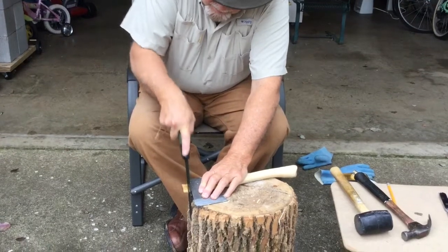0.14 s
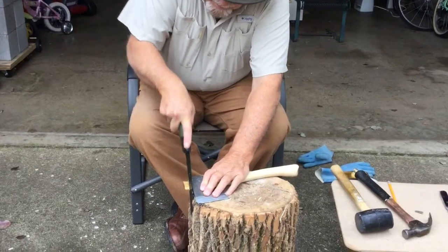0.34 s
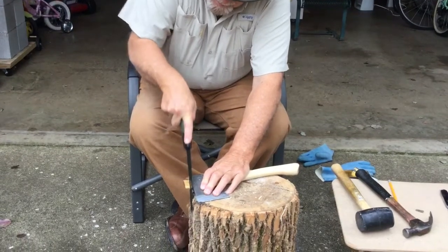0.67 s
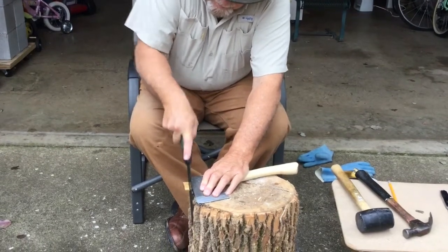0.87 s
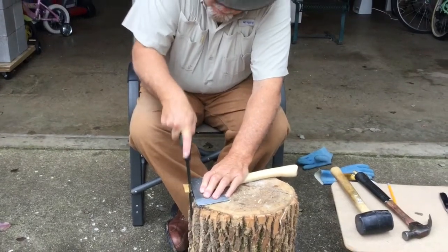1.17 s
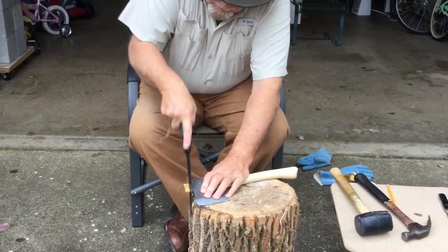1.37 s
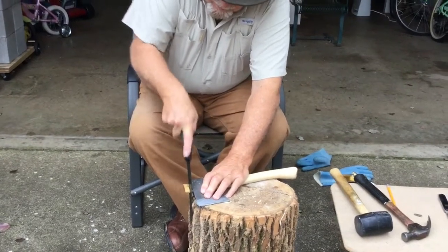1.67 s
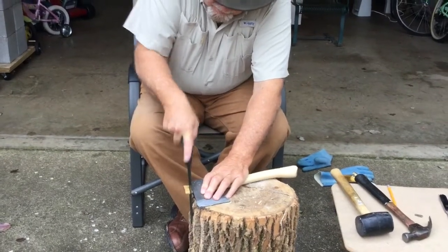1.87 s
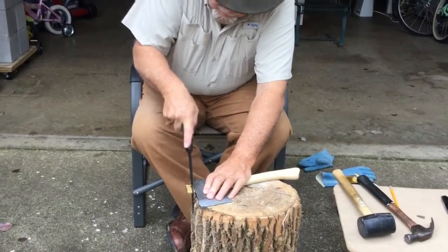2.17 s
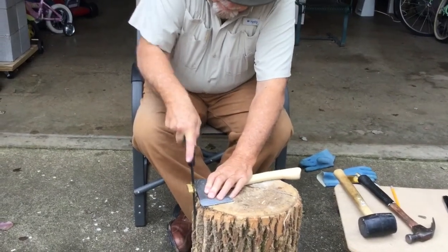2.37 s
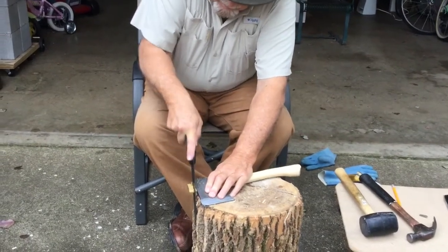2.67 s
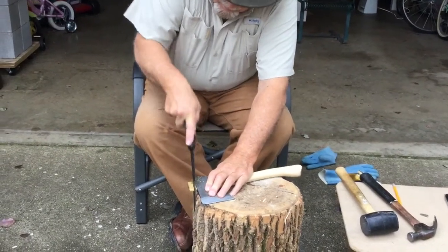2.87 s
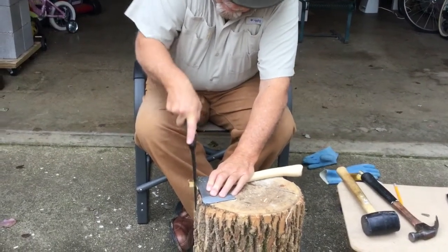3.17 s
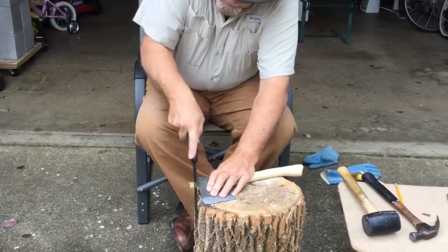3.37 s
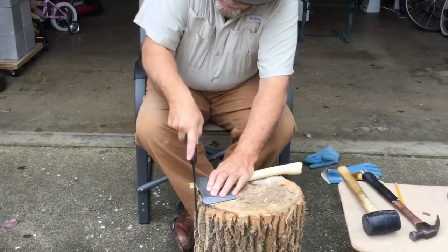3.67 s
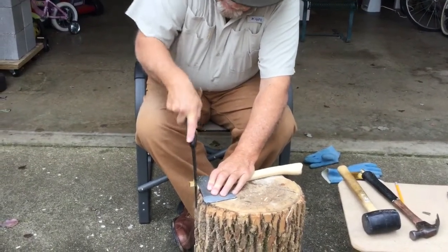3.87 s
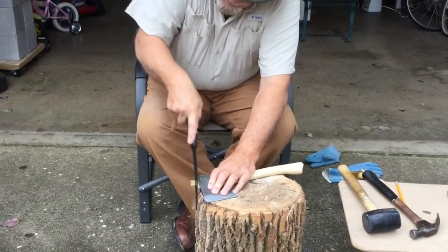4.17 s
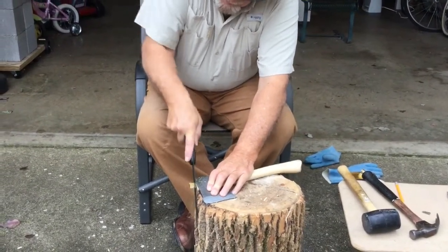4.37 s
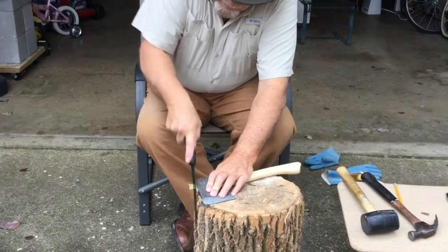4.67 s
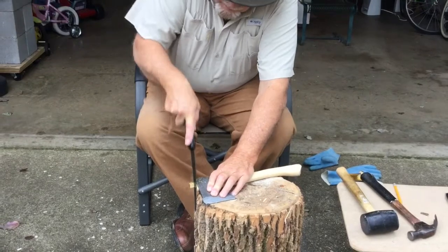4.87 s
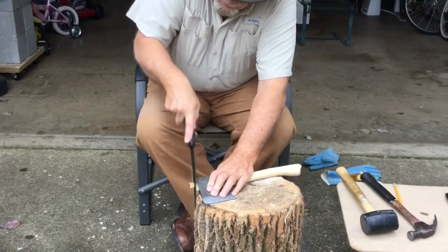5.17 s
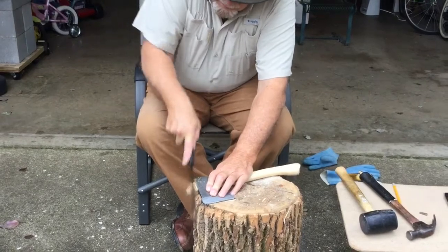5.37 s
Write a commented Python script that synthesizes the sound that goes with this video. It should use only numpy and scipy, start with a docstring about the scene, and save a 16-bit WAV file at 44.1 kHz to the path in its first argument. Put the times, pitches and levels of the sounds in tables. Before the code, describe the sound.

Sawing is under way from the start. A small hand saw cuts a wooden handle braced on a stump, with strokes about 0.17 seconds apart, pull and push alternating. Each is a dry, gritty rasp of roughly a tenth of a second, bright and hissy with a thin steely edge and a hollow woody tone. Pulls are lighter; pushes add a low, juddering thump from the stump. A narrow whistly colour drifts down during the first second, jumps high around 1.4 to 1.7, then sinks gradually after 3.5. Small tooth ticks come early and near 2.1 and 2.7, with a sharp snap at 3.3. Soft turning bumps grow clearer after 2.4; faint dull knocks occur around 2.7, 4.0 and 4.8, stronger at 5.14. The final push stops dead at 5.44 in a loud, crisp double wooden clack, leaving a short garage echo and quiet low outdoor rumble.

```python
"""A small hand saw cuts through a wooden handle held down on a stump, in front of an open garage.
Teeth tear fibres on every pull and push: noise bursts and tooth pulses excite modes of blade and wood.
Judder kicks the stump's low resonances, mostly on the push; a narrow resonance drifts as the cut deepens.
Caught teeth snap free, knocks ring the handle, turns bump the stump; the last stroke ends in a wooden clack.
Scatter and a garage echo follow each sound, over a steady low outdoor noise."""
import sys
import numpy as np
from scipy import signal
from scipy.fft import rfft, irfft, next_fast_len
from scipy.io import wavfile
from scipy.ndimage import map_coordinates

SR = 44100
rng = np.random.default_rng(int(sys.argv[2]) if len(sys.argv) > 2 else 0)


def generate_wav(signal):
    """Clip the signal to [-1, 1] and save it as 16-bit WAV at the path in sys.argv[1]."""
    frames = np.transpose(np.atleast_2d(signal))
    scaled = np.clip(frames, -1, 1) * 32767
    pcm = np.round(scaled).astype(np.int16)
    wavfile.write(sys.argv[1], SR, pcm)


N = 243873
SIZE = 16384  # samples in one event
T = np.arange(SIZE) / SR  # seconds

# Saw strokes, pull and push in turn. Each row: start in seconds, length in seconds,
# share of the length spent speeding up, rasp level in dB, thump level in dB.
STROKES = [(-0.001, 0.12, 0.16, -48, -49.5), (0.168, 0.11, 0.22, -50.5, -33.5),
           (0.341, 0.11, 0.29, -46.5, -47.2), (0.498, 0.083, 0.37, -48, -40),
           (0.649, 0.11, 0.61, -48.5, -47.5), (0.849, 0.091, 0.24, -48, -37.3),
           (1.019, 0.11, 0.27, -47.5, -47.5), (1.198, 0.098, 0.33, -47, -33.5),
           (1.364, 0.13, 0.26, -45, -43), (1.547, 0.1, 0.39, -48.5, -36), (1.722, 0.1, 0.18, -46.5, -48.5),
           (1.892, 0.101, 0.31, -45, -30.5), (2.056, 0.16, 0.34, -47.5, -44.5),
           (2.262, 0.12, 0.23, -47.5, -34), (2.426, 0.14, 0.17, -43.3, -39),
           (2.604, 0.14, 0.27, -47.0, -31.5), (2.791, 0.11, 0.15, -45.5, -49.5),
           (2.956, 0.1, 0.22, -43.5, -30.5), (3.094, 0.14, 0.24, -47, -46.5),
           (3.282, 0.1, 0.47, -45, -27.5), (3.465, 0.12, 0.22, -45, -48),
           (3.599, 0.133, 0.55, -46.5, -33.5), (3.792, 0.13, 0.33, -47, -50.5),
           (3.989, 0.11, 0.2, -45.5, -31), (4.146, 0.14, 0.18, -46.5, -47.5),
           (4.335, 0.1, 0.38, -46.5, -34), (4.472, 0.14, 0.32, -48.5, -47), (4.664, 0.11, 0.39, -48, -29.5),
           (4.836, 0.14, 0.34, -49.5, -41), (4.993, 0.12, 0.34, -49.5, -34.5),
           (5.14, 0.14, 0.36, -48, -42.5), (5.348, 0.12, 0.54, -44.5, -27)]
# A tooth snags and lets go. Each row: start in seconds, relative peak in dB, decay by 60 dB in seconds.
SNAGS = [(0.014, -29, 0.014), (0.194, -33.5, .025), (0.417, -26.5, 0.023), (0.662, -35.5, 0.028),
         (2.089, -33, .025), (2.161, -29, 0.018), (2.688, -34, 0.026), (2.812, -33, 0.026),
         (3.2944, -17, 0.012), (3.878, -37, 0.013), (4.165, -35.5, 0.067), (5.433, -24, 0.017)]
# Blade or handle knocks on wood. Each row: start in seconds, relative peak in dB,
# frequency in Hz above which the contact is too soft to ring.
CLACKS = [(1.001, -47.5, 2000), (2.394, -45, 2050), (2.687, -38.5, 2000), (4.001, -39, 2510),
          (4.098, -41, 2120), (4.672, -51, 2000), (4.795, -37, 1700), (5.1425, -31, 1980),
          (5.4416, -16.5, 4530), (5.4486, -25, 2400)]
# The handle rocks on the stump as the saw turns round. Each row: start in seconds, relative peak in dB.
BUMPS = [(0.618, -39), (0.983, -32.5), (1.328, -35.5), (1.701, -35), (2.013, -28.5), (2.415, -25),
         (2.764, -25.5), (3.722, -32.5), (4.474, -29), (4.797, -25.5), (5.143, -24), (5.438, -32)]
# Modes of the knocked handle. Each row: frequency in Hz, mean level in dB, decay by 60 dB in seconds.
HANDLE_MODES = [(487, -4.5, 0.047), (764, -12, 0.063), (1083, -1.5, .035), (1270, -3, 0.041),
                (1540, -1, .035), (1837, -2, 0.042), (2067, -1, 0.035), (2360, -4, 0.038), (3500, 0, 0.031),
                (4430, -10, 0.06)]
# Ringing modes of the steel blade. Each row: frequency in Hz, width in Hz, relative level in dB.
BLADE_MODES = [(2567, 33, -19.5), (3510, 230, -13.5), (3763, 51, -18), (4040, 230, -14), (4590, 100, -19.5),
               (5196, 43, -16.5), (5960, 160, -17.5), (6550, 89, -20.5), (7580, 61, -23.5),
               (8200, 170, -12), (8220, 32, -25), (9370, 170, -14), (10900, 300, -17.5), (12560, 130, -14)]
# Rasp of the teeth. Each row: frequency in Hz, relative density in dB per Hz.
RASP = [(1500, -27), (2400, 0.5), (2800, 2.5), (3600, 4), (4500, -0.5), (6000, 3.5), (7100, 1.5),
        (8200, 4.5), (9300, 1), (10500, -12.5), (14000, -40)]
# Ring of the wood. Each row: frequency in Hz, relative density in dB per Hz.
WOOD = [(300, -18.5), (430, -24.5), (620, -3.5), (850, -27.5), (1100, -7.5), (1300, 5), (1500, 6),
        (1750, -5), (2050, 1), (2400, -11), (3200, -26.5)]
# Treble fizz of the fibres. Each row: frequency in Hz, relative density in dB per Hz.
FIZZ = [(7500, -53), (9800, -5), (10900, 1), (11700, 0.5), (12600, -1), (13600, -1.5), (14700, -8),
        (15800, -25.5)]
# Handle and stump under load. Each row: frequency in Hz, relative density in dB per Hz.
STUMP = [(25, -54), (90, -30.5), (125, -17), (166, 1.5), (208, -3.5), (238, 2), (268, 2), (298, -2),
         (325, -14), (355, -13.5), (430, -28), (600, -46), (1200, -62), (5000, -100)]
# Dry crack of wood struck hard. Each row: frequency in Hz, relative density in dB per Hz.
CRACK = [(250, -28), (500, -3), (750, -5.5), (1100, -12), (1500, 6), (2000, -2.5), (2400, -1),
         (2900, -10.5), (4200, -4), (6000, -13), (12000, -36)]
# Slowly drifting narrow resonance of the cut. Each row: time in seconds, frequency in Hz, relative level in dB.
KERF = [(0, 4950, -3), (.65, 3550, -6.5), (1.2, 2720, -12.5), (1.36, 7700, -8), (1.72, 10900, -12),
        (2.42, 8300, -2), (2.8, 8650, -9), (3.46, 8670, 2.5), (3.79, 7860, -1), (3.99, 6000, -1.5),
        (4.45, 4830, -6), (4.68, 4020, 0), (5.35, 3060, -12)]
# Strength of the fizz. Each row: time in seconds, relative level in dB.
FIZZ_LEVEL = [(0, -5.5), (1.1, -3.5), (2.5, -5.5), (3.4, -3.5), (3.65, -9), (4.15, -8), (4.85, -2.5),
              (5.35, -2)]
# Decay of the garage echo. Each row: frequency in Hz, decay by 60 dB in seconds.
GARAGE_T60 = [(150, 0.5), (350, 0), (1500, 0.53), (5000, 0.32), (14000, 1.6)]
# Strength of the garage echo. Each row: frequency in Hz, level in dB.
GARAGE_DB = [(150, -4.5), (350, -9), (700, -7), (2000, -9.5), (12000, -19.5)]
# Outdoor background. Each row: frequency in Hz, relative density in dB per Hz.
AMBIENT = [(25, -27), (40, -9), (65, 4.5), (110, 3.5), (170, 8), (270, -4.5), (350, 5), (430, -17),
           (900, -19), (2000, -25.5), (5000, -27.5), (15000, -42.5)]

HOLD_SHARE = 0.33  # share of each stroke between speeding up and slowing down
# The pull eases off, the push leans in: swell over the hold in dB, relative level of the wood in dB.
PULL, PUSH = (-2, -6.5), (0.97, -4)
WOOD_DB_PER_S = 0.58  # the handle rings more freely as the cut deepens
GRAZE_S, GRAZE_DB = 0.016, -21  # the teeth brush the cut lightly just before they bite
JAM_S = 5.440  # the last stroke stops dead as the saw knocks against the wood
TOP_HZ = 15850  # upper band limit of the microphone


def saw(judder_hz=69, judder_wander=0.12, tooth_hz=950, grip_db=1.5, steel_db=-1.5):
    """Forced vibration: the tearing force of each stroke sounds through blade, wood and stump."""
    track = np.zeros(N)
    steel = sum(amp(db + steel_db) * resonance(hz, width) for hz, width, db in BLADE_MODES)
    rasp, wood, fizz = body(RASP), body(WOOD), body(FIZZ)
    for k, (s, length, rise_share, rasp_db, thump_db) in enumerate(STROKES):
        swell_db, wood_db = PUSH if k % 2 else PULL
        ring_hz, ring_db = at(KERF, s)
        fizz_db, = at(FIZZ_LEVEL, s)
        start = s - GRAZE_S
        speed = hand_speed(length, rise_share, swell_db) * (start + T < JAM_S)
        # running counts of judders and of passing teeth
        judder = rng.random() + np.cumsum(judder_hz * np.exp(judder_wander * wobble(39.3))) / SR
        # the tooth rate follows the hand, unsteadily
        teeth = np.cumsum(tooth_hz * np.sqrt(speed) * amp(0.7 * wobble(90))) / SR
        # hard and soft grain make the teeth grip unevenly
        cut = matched(speed * amp(grip_db * wobble(107)), speed)
        parts = [
            amp(-2.5) * rasp,
            steel,
            amp(wood_db + WOOD_DB_PER_S * s) * wood,
            amp(fizz_db) * fizz,
            amp(ring_db) * resonance(ring_hz, width_hz=0.08 * ring_hz),
        ]
        scrape = np.zeros(SIZE)
        for part in parts:
            # each part has its own fibre noise, under the same judder and teeth
            force = tearing(cut, judder, teeth, tooth_depth=1.0, tooth_tone=0.28,
                            judder_db=1.5, clump_db=2.5)
            scrape += through(force, part)
        scrape = sliding(scrape, depth_db=3.8, patch_hz=380, patch_s=0.022)
        thump = thumping(speed, judder, lag_s=0.0054, scatter_db=1.5, rub=0.61)
        add(track, start, in_garage(amp(rasp_db) * scrape + amp(thump_db) * thump))
    return track


def hand_speed(length, rise_share, swell_db):
    """Kinematics of a stroke: the hand creeps off, speeds up, runs on and stops."""
    corners = GRAZE_S + length * np.clip([0, rise_share, rise_share + HOLD_SHARE, 1], 0, 1)
    speeds = [0, amp(GRAZE_DB), amp(-swell_db / 2), amp(swell_db / 2), 0]
    return np.interp(T, [0, *corners], speeds)


def tearing(speed, judder, teeth, tooth_depth, tooth_tone, judder_db, clump_db):
    """Periodic excitation: each tooth gives a push and a burst of snapping fibres, harder at each judder."""
    bite = np.exp(-tooth_depth * (teeth % 1))
    snaps = unit(rng.standard_normal(SIZE) * bite)
    pushes = unit(np.diff(np.floor(teeth), prepend=0)) * np.sqrt(np.mean(speed > 0))
    pressure_db = judder_db * np.cos(2 * np.pi * judder) + clump_db * wobble(400.0)
    force = (snaps + tooth_tone * pushes) * amp(pressure_db) * speed
    return matched(force, speed)


def sliding(sound, depth_db, patch_hz, patch_s):
    """Moving excitation point: as the cut slides along the blade, groups of modes swell and fade."""
    window, overlap = 512, 384
    z = signal.stft(sound, nperseg=window, noverlap=overlap)[2]
    bins, frames = np.indices(z.shape)
    # a smooth random field over frequency and time
    places = [bins * SR / window / patch_hz, frames * (window - overlap) / SR / patch_s]
    field = map_coordinates(rng.standard_normal((200, 100)), places, mode="wrap")
    shaded = signal.istft(z * amp(depth_db * field), nperseg=window, noverlap=overlap)[1]
    return matched(shaded[:SIZE], sound)


def thumping(speed, judder, lag_s, scatter_db, rub):
    """Impulsive forcing: judder kicks and rubbing shake the stump; the load lags just behind the stroke."""
    load = np.interp(T - lag_s, T, speed, left=0)
    kicks = np.diff(np.floor(judder), prepend=0) * amp(scatter_db * wobble(69.0))
    force = load * (unit(kicks) + rub * rng.standard_normal(SIZE))
    return matched(through(force, body(STUMP)), load)


def snags(ring=1.5, fizz=1.0):
    """Sudden release: a caught tooth springs free, and a short decaying noise force excites the steel."""
    track = np.zeros(N)
    steel = body(RASP) + ring * resonance(7580, width_hz=920) + fizz * body(FIZZ)
    for s, db, t60 in SNAGS:
        force = rng.standard_normal(SIZE) * amp(-60 * T / t60)
        snap = through(force, steel)
        add(track, s, amp(db) * in_garage(peaked(snap)))
    return track


def clacks(crack=1.6, crack_t60=0.037, gain_db=-1.0):
    """Modal impact: a contact rings the handle under a woody crack; soft contacts lose the treble."""
    track = np.zeros(N)
    for s, db, soft_hz in CLACKS:
        ring = np.zeros(SIZE)
        for hz, level_db, t60 in HANDLE_MODES:
            # each knock excites the modes a little differently
            decay = amp(level_db + rng.normal(0, 0.85) - 60 * T / t60)
            ring += decay * np.sin(2 * np.pi * (hz * T + rng.random()))
        force = rng.standard_normal(SIZE) * amp(-60 * T / crack_t60)
        clack = ring + crack * through(force, body(CRACK))
        clack = signal.sosfilt(signal.butter(2, soft_hz, fs=SR, output="sos"), clack)
        add(track, s, amp(db + gain_db) * in_garage(peaked(clack)))
    return track


def bumps(gain_db=1.5, wood_db=-34):
    """Impulse response: one soft blow at a turn of the saw lets the stump sound by itself."""
    track = np.zeros(N)
    thud = body(STUMP) + amp(wood_db) * body(CRACK)
    for s, db in BUMPS:
        add(track, s, amp(db + gain_db) * in_garage(peaked(thud)))
    return track


def in_garage(sound, near_db=-8, near_t60=0.15):
    """Reverberation: direct sound, quick scatter off ground and nearby things, and the garage's echo."""
    hz, t, z = signal.stft(rng.standard_normal(SR // 2), SR, nperseg=256)
    t60 = along(GARAGE_T60, hz)[:, None]
    level_db = along(GARAGE_DB, hz)[:, None]
    # the root gives each band's decay the same energy, whatever its length
    gain = amp(level_db - 60 * t / t60) * np.sqrt(2 * np.log(1000) / (t60 * SR))
    late = signal.istft(z * gain, SR, nperseg=256)[1]
    echo = np.pad(late, (SR // 200, 0))  # arrives 5 ms late
    scatter = unit(rng.standard_normal(SIZE) * amp(-60 * T / near_t60)) / np.sqrt(SIZE)
    echo[:SIZE] += amp(near_db) * scatter
    echo[0] = 1  # direct sound
    return signal.fftconvolve(sound, echo) / np.hypot(1, amp(near_db))


def outdoors(db=-53):
    """Stationary noise: filtered white noise gives the steady low rumble of the surroundings."""
    noise = signal.fftconvolve(rng.standard_normal(N + SIZE), body(AMBIENT))[SIZE:SIZE + N]
    return amp(db) * unit(noise)


def body(spectrum):
    """Minimum phase: the causal impulse response of energy 1 that has this spectrum."""
    gain = amp(along(spectrum, np.fft.rfftfreq(SIZE, 1 / SR)))
    cepstrum = irfft(np.log(gain))
    fold = 1 + np.sign(SIZE // 2 - np.arange(SIZE))  # keeps the causal half
    return unit(irfft(np.exp(rfft(cepstrum * fold)))) / np.sqrt(SIZE)


def resonance(hz, width_hz):
    """Damped oscillator: the impulse response of energy 1 of a single mode."""
    return unit(np.sin(2 * np.pi * hz * T) * np.exp(-np.pi * width_hz * T)) / np.sqrt(SIZE)


def through(force, response):
    """Convolution: the sound of a force acting on a body."""
    return signal.fftconvolve(force, response)[:len(force)]


def wobble(rate):
    """Random modulation: a smooth curve for one event, with rate knots a second."""
    return map_coordinates(rng.standard_normal(SIZE // 16), [T * rate], mode="wrap")


def amp(db):
    """Logarithmic level: decibels to gain."""
    return 10 ** (np.asarray(db) / 20)


def unit(x):
    """Normalisation: scale to rms 1."""
    return x / np.sqrt(np.mean(x ** 2) + 1e-20)


def peaked(x):
    """Normalisation: scale to peak 1."""
    return x / np.abs(x).max()


def matched(x, envelope):
    """Equal energy: give x the energy of the envelope."""
    return unit(x) * np.sqrt(np.mean(envelope ** 2))


def along(points, hz):
    """Logarithmic frequency: read rows of frequency in Hz and value on a log axis."""
    f, v = np.transpose(points)
    return np.interp(np.log(hz + 1), np.log(f), v)


def at(curve, s):
    """Linear interpolation: the columns of a slow curve at s seconds."""
    times, *columns = np.transpose(curve)
    return [np.interp(s, times, column) for column in columns]


def add(track, s, sound):
    """Superposition: mix a sound into the track at s seconds."""
    start = int(round(s * SR))
    sound = sound[max(-start, 0):max(N - start, 0)]
    track[max(start, 0):][:len(sound)] += sound


def scene():
    """Superposition: the saw with its knocks over the outdoor background."""
    return (saw() + snags() + clacks() + bumps() + outdoors())[None]


def record(dry):
    """Band limiting: the microphone drops the deepest bass and keeps nothing above its band limit."""
    dry = signal.sosfilt(signal.butter(2, 38, "high", fs=SR, output="sos"), dry)
    size = next_fast_len(N + SIZE)
    passed = np.fft.rfftfreq(size, 1 / SR) < TOP_HZ
    return irfft(rfft(dry, size) * passed, size)[:, :N]


dry = scene()
out = record(dry)
generate_wav(out)
```